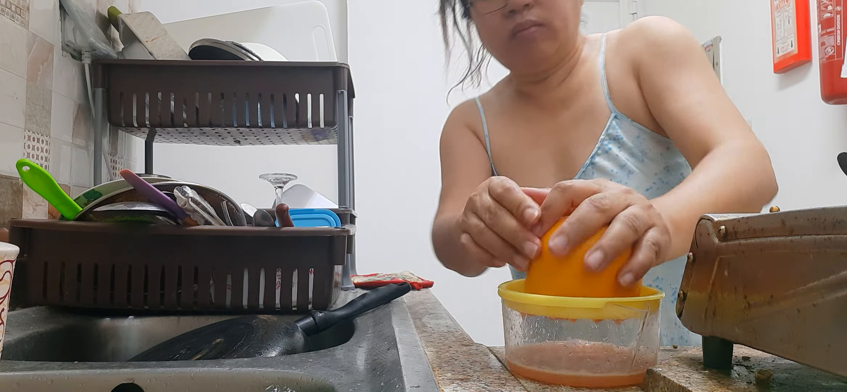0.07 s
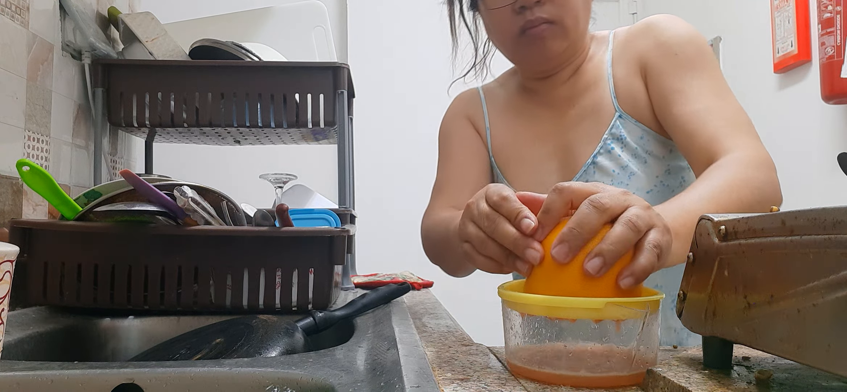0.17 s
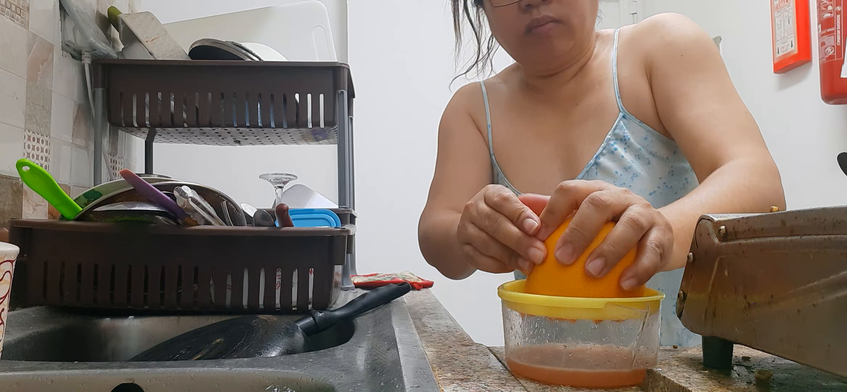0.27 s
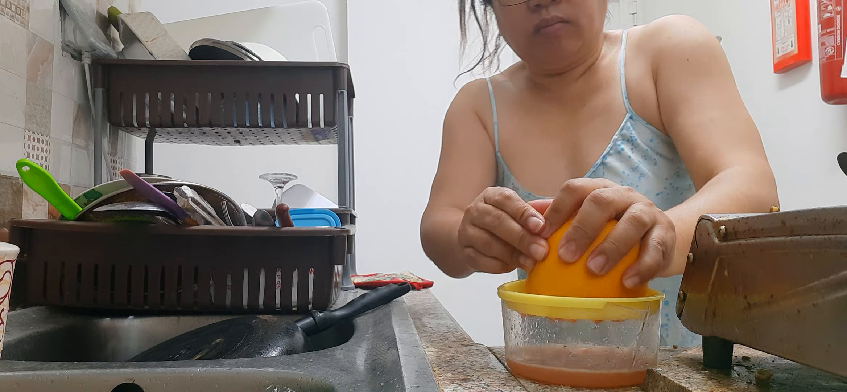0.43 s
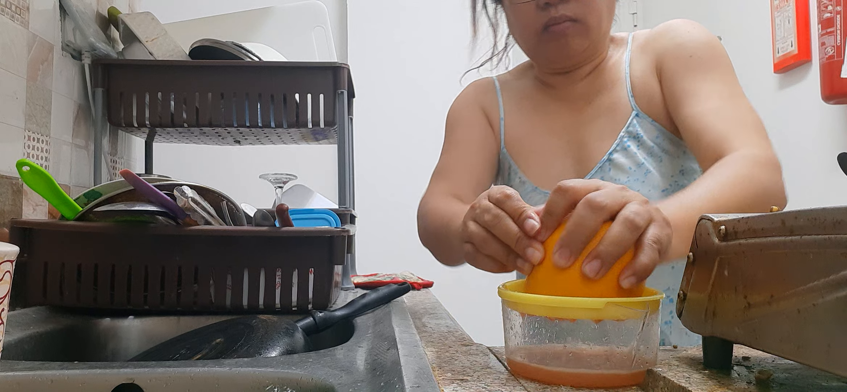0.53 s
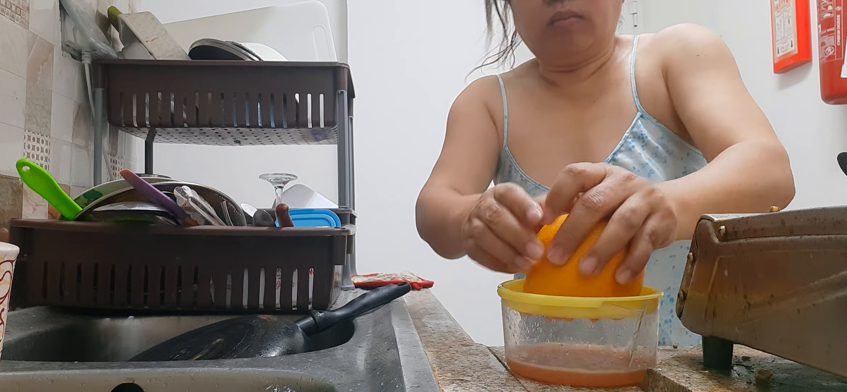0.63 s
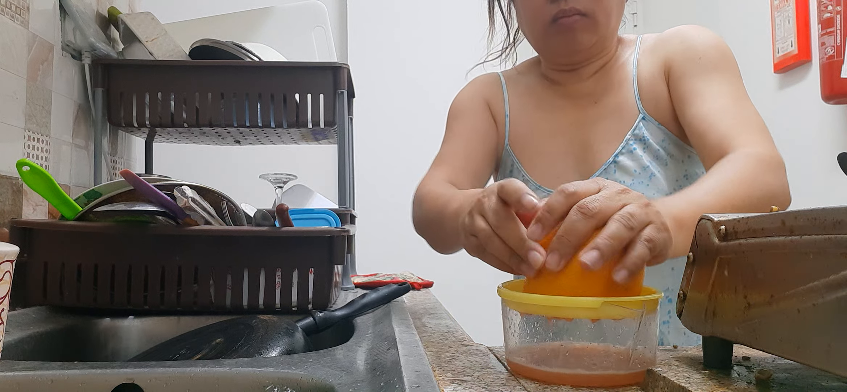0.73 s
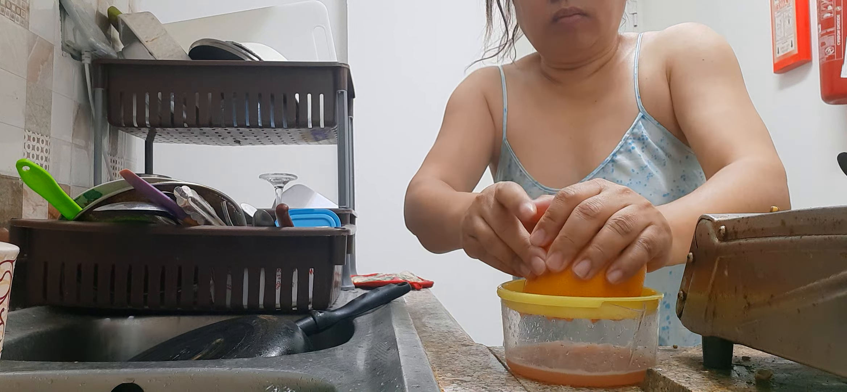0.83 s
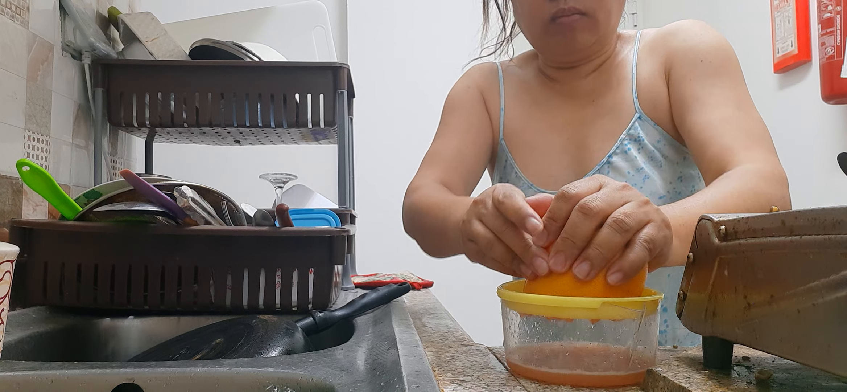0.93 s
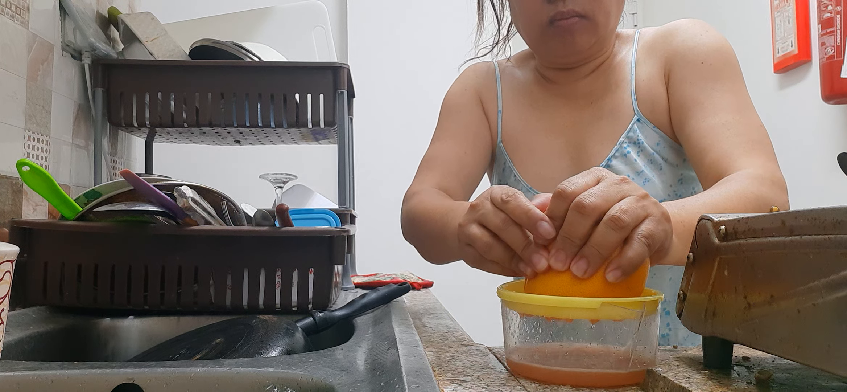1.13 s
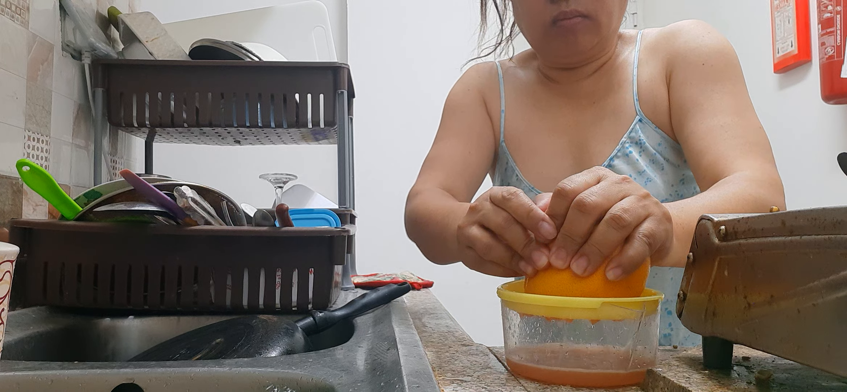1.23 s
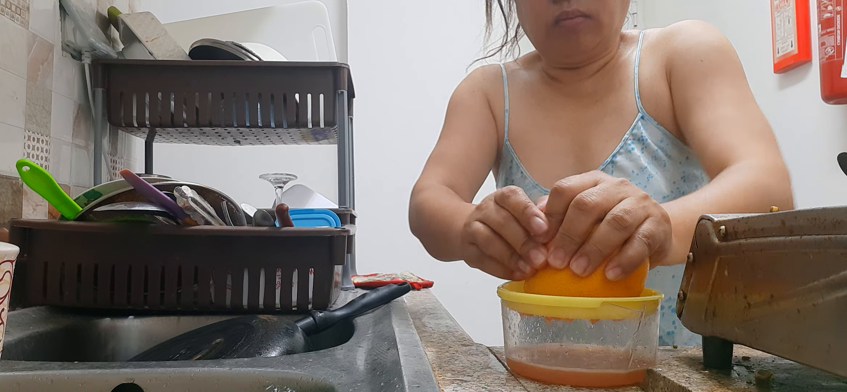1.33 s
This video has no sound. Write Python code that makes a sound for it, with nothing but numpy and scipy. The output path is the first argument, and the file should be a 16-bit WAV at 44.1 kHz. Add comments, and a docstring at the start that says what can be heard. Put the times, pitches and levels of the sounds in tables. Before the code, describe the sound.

A citrus half squishes on a plastic juicer, close by in a small, slightly echoing kitchen. Pulp crackles wetly from about 0.2 seconds, and the strainer knocks with a sharp pop near 0.45. Trapped air gurgles and glugs from 0.6 to 0.8. The rind squeaks briefly just before 1 second, then juice spurts with knocks and a squelch. Two lighter knocks follow around 1.2, over faint hum and hiss.

```python
"""A citrus half pressed and twisted on a plastic juicer, close to a microphone pair in a small hard kitchen.
Pulp bursts in dense wet crackles and the strainer knocks on its cup; both ring the plastic.
Wet pockets pop, the rind squeaks over the ribs, and juice spurts through the slots with a squelch.
Trapped air glugs and gurgles, heard in the centre and echoing off the counter and walls.
Underneath are dull thuds of the counter and the room tone: faint rumble, hiss and mains hum."""
import sys
import numpy as np
from scipy import signal
from scipy.fft import rfft, irfft, next_fast_len
from scipy.io import wavfile
from scipy.ndimage import uniform_filter1d

SR = 44100
rng = np.random.default_rng(int(sys.argv[2]) if len(sys.argv) > 2 else 0)


def log_audio(samples):
    """Write samples as a 16-bit WAV file to the path given in sys.argv[1]."""
    # one column per channel
    frames = np.atleast_2d(samples).T
    # limit to full scale, then quantise
    limited = np.clip(frames, -1, 1)
    pcm = np.round(limited * 32767).astype(np.int16)
    wavfile.write(sys.argv[1], SR, pcm)


N = 61739

# room tone spectrum: f/Hz, relative level/dB
AIR_SPECTRUM = [(25, -28.5), (40, -16), (52, -3.5), (130, -6), (200, -6.5), (370, -0.5), (510, -1),
                (680, -17.5), (1400, -22.5), (2300, -18.5), (2950, -15), (3600, -28), (4600, -10),
                (5300, -23), (6000, -26), (7200, -29.5), (9000, -38), (15500, -37.5)]
# room tone swell: t/s, level/dB
AIR_LEVEL = [(0, -61), (.2, -56), (.85, -61), (1.2, -61.5), (1.38, -64.5)]
# room tone width: f/Hz, side against mid/dB
AIR_WIDTH = [(100, -4), (400, -10.5), (1200, 1.5), (5000, 0)]
# mains hum: t/s, level/dB
HUM_LEVEL = [(0, -67.5), (.09, -60), (.21, -64), (.26, -77.5), (.8, -69), (1.3, -70), (1.39, -82)]
# centres of the six bands of knocks and squeezes: f/Hz
BAND_CENTRES = [400, 1000, 2100, 3700, 7200, 12500]
# knocks of strainer and ribs: t/s, rattle decay/s, six band levels/dB
STRAINER_KNOCKS = [(.096, 0.0025, -52, -57.5, -64, -62.5, -77, -94),
                   (0.4193, 0.0037, -54, -56, -48.5, -53.5, -54.5, -65),
                   (.4415, 0.0074, -47, -46.5, -49.5, -59, -62, -90),
                   (0.4592, 0.003, -53, -61, -52, -59, -77, -90),
                   (0.4626, 0.0038, -48, -39.5, -39.5, -43.5, -47, -56.5),
                   (1.007, 0.008, -57.5, -39.5, -39, -65, -32.5, -61.5),
                   (1.025, 0.0043, -47, -56, -37.5, -36, -36.5, -61),
                   (1.164, 0.011, -64, -57, -56, -47, -54, -74),
                   (1.239, 0.0095, -66.5, -50.5, -53.5, -45.5, -59, -70)]
# modes of strainer and cup: f/Hz, t60/s, lift/dB
JUICER_MODES = [(242, 0.17, 13), (340.7, 0.11, 7), (373, 0.35, 11), (489, 0.093, 0), (847, 0.11, -0.5),
                (1033, 0.028, 1.5), (2886, 0.063, 3), (3050, 0.15, -3)]
# broad tone colour shared by knocks and crackles, with microphone-like dips: f/Hz, relative level/dB
CONTACT_EQ = [(100, -24.5), (255, -15.5), (345, -4.5), (520, -2), (690, -4), (830, -1), (1250, -5.5),
              (2000, -2.5), (3200, -1), (4200, 1.5), (5200, 2), (5850, -2.5), (6800, 0), (8200, 0),
              (9500, -14.5), (11000, 1.5), (16000, -9)]
# counter under the pressing hands: t/s, half-width/s, level/dB
COUNTER_THUDS = [(.13, 0.05, -72), (0.747, 0.059, -61.5), (1.01, 0.033, -70.5)]
# glugs of trapped air: t/s, f/Hz, rise/s, level/dB
AIR_GLUGS = [(.194, 410.5, 0.01, -49.5), (0.59, 622, 0.01, -52.5), (0.758, 364, 0.0082, -50),
             (0.778, 350, 0.0039, -44.5), (0.789, 371, 0.0036, -42), (0.856, 349, 0.016, -55)]
# squeezes of the pulp: peak t/s, rise/s, fall/s, six band levels/dB
PULP_SQUEEZES = [(0.209, 0.0083, 0.048, -53.5, -51, -58, -63, -62.5, -103),
                 (0.289, 0.051, 0.04, -53.5, -50, -54.5, -54, -59, -74),
                 (.505, 0.025, 0.018, -61.5, -86, -82, -54.5, -66, -63.5),
                 (0.664, 0.017, 0.053, -56, -66.5, -61, -65.5, -62.5, -67.5),
                 (0.76, 0.0085, 0.0094, -60, -42, -47, -59.5, -110, -113),
                 (0.914, 0.0062, 0.011, -63, -56, -52.5, -54, -55.5, -61),
                 (0.938, 0.0046, 0.028, -55, -53, -40.5, -49.5, -51, -60),
                 (.976, .012, 0.012, -60.5, -52, -50, -57, -68, -70),
                 (1.031, 0.037, 0.051, -54.5, -47.5, -45, -53.5, -46.5, -79),
                 (1.069, 0.015, 0.0087, -53, -48.5, -47.5, -63, -50, -70)]
# wet pops and snaps: t/s, f/Hz, decay/s, level/dB
WET_POPS = [(0.4197, 4900, 0.0042, -36), (.4624, 920, 0.0023, -23), (.936, 840, 0.0087, -39),
            (1.0062, 874, 0.0049, -27), (1.022, 920, 0.0069, -34.5), (1.0228, 3310, 0.0026, -30)]
# course of the hollow gurgle: t/s, f/Hz, level/dB
GURGLE_CURVE = [(.563, 540, -56), (.576, 455, -47), (.585, 380, -47), (.594, 368, -45), (.607, 380, -54),
                (.615, 372, -49), (.625, 365, -55), (.636, 360, -48), (.648, 345, -57), (.67, 330, -60)]
# course of the rind's squeak: t/s, f/Hz, level/dB
SQUEAK_CURVE = [(.932, 2400, -59), (0.942, 2412, -46.5), (0.956, 2227, -52.5), (.964, 2866, -52),
                (0.977, 2999, -45), (0.987, 2840, -47.5), (0.996, 2616, -45), (1.004, 2530, -51)]
# ring of the strainer slots: f/Hz, t60/s, level/dB
SLOT_MODES = [(2992, 0.13, -41.5), (3270, 0.34, -44), (3530, 0.14, -46.5), (3915, 0.28, -45)]
# course of the pulp's squelch: t/s, f/Hz, level/dB
SQUELCH_CURVE = [(1.03, 900, -60), (1.05, 998.3, -49.5), (1.073, 1050, -46), (1.082, 1030, -58)]

HUM_HZ, HUM_WAVER_DB = 99.6, 5.5
KNOCK_S, RATTLE = .005, 1.67  # a knock has the energy of KNOCK_S at its level; rattle against tick
ROOM_T60_S, TREBLE_T60_S, TAIL_DB, EARLY_DECAY_S = .49, .34, -2.5, .0069
BASS_WET_DB, POP_WET_DB, GLUG_WET_DB = -11.5, -5.5, 2
THUD_HZ, THUD_WAVER_HZ = 53.4, 4.1
GLUG_SAG_PER_S, GLUG_ROUGH, GLUG_JITTER = 1, .15, .055
GRAINS_PER_S, GRAIN_SPREAD_DB = 1700, 3
SPURT_AT_S, SPURT_RISE_S = 1.023, .0021
LEFT_LEAD_DB, LEFT_LAG_S, TOP_HZ = 2, .00005, 15850


def undb(db):
    """Decibels to gain."""
    return 10 ** (np.asarray(db) / 20)


def unit(x):
    """Scale to rms 1."""
    return x / np.sqrt(np.mean(x ** 2) + 1e-20)


def colour(x, points):
    """Minimum-phase filter through points of f/Hz, level/dB."""
    hz, db = np.array(points, float).T
    size = 4096
    f = np.maximum(np.fft.rfftfreq(size, 1 / SR), 1)
    cepstrum = irfft(np.log(undb(np.interp(np.log(f), np.log(hz), db))))
    cepstrum[1:size // 2] *= 2
    cepstrum[size // 2 + 1:] = 0
    impulse = irfft(np.exp(rfft(cepstrum)))
    length = next_fast_len(N + size)
    return irfft(rfft(x, length) * rfft(impulse, length), length)[..., :N]


def banded(x, band_db):
    """Give a white sound a level in each band, about an octave wide."""
    hz = np.array(BAND_CENTRES)
    return colour(x, np.c_[hz, np.array(band_db) + 10 * np.log10(SR / hz)])


def walk(rate):
    """Smooth random drift of rms 1, with rate new values a second."""
    hold = int(SR / rate)
    steps = np.repeat(rng.standard_normal(N // hold + 1), hold)[:N]
    return unit(uniform_filter1d(uniform_filter1d(steps, hold), hold))


def tone(hz, jitter, flutter_db, rate):
    """A wet, unsteady oscillation: pitch and strength waver about rate times a second."""
    phase = 2 * np.pi * np.cumsum(hz * np.exp(jitter * walk(rate))) / SR
    return np.sin(phase) * undb(flutter_db * walk(rate))


def glide(t, curve, jitter, flutter_db, rate):
    """An unsteady tone that follows points of t/s, f/Hz, level/dB."""
    at, hz, db = np.array(curve).T
    gate = np.clip(np.minimum(t - at[0], at[-1] - t) / .003, 0, 1)
    return tone(np.interp(t, at, hz), jitter, flutter_db, rate) * undb(np.interp(t, at, db)) * gate


def room_tone(t):
    """Low rumble and thin hiss spread across the pair, with a wavering mains hum in the centre."""
    mid, side = colour(rng.standard_normal((2, N)), AIR_SPECTRUM)
    air = unit(mid + colour(side, AIR_WIDTH) * np.array([[1], [-1]]))
    hum_db = np.interp(t, *np.array(HUM_LEVEL).T) + HUM_WAVER_DB * walk(7.7)
    hum = np.sqrt(2) * np.sin(2 * np.pi * HUM_HZ * t) * undb(hum_db)
    return air * undb(np.interp(t, *np.array(AIR_LEVEL).T)) + hum


def clatter(decay):
    """A sharp tick and a short decaying rattle, with an even spectrum and energy 1."""
    size = 2048
    fade = np.exp(-np.arange(size) / (SR * decay))
    hit = RATTLE * unit(rng.standard_normal(size) * fade)
    hit[0] -= np.sqrt(size)  # the tick
    phase = np.angle(rfft(hit, 2 * size))
    even = irfft(np.exp(1j * phase))[:size]
    return np.pad(unit(even) / np.sqrt(size), (0, N - size))


def knocks():
    """The strainer jolts against its cup."""
    hits = sum(banded(np.roll(clatter(decay), int(at * SR)), band_db)
               for at, decay, *band_db in STRAINER_KNOCKS)
    return hits * np.sqrt(KNOCK_S * SR)


def juicer(x, t):
    """The plastic rings on at its modes; strike and ring then share one broad tone colour."""
    ring = 0
    for hz, t60, db in JUICER_MODES:
        damping = np.log(1000) / t60
        ring += undb(db) * 2 * damping / SR * np.exp(-damping * t) * np.cos(2 * np.pi * hz * t)
    return colour(x + signal.fftconvolve(x, ring)[:N], CONTACT_EQ) * undb(-4)


def kitchen(x, t):
    """Quick reflections off the counter, then the tail of the walls, different at each microphone."""
    noise = rng.standard_normal((2, N))
    low = signal.sosfilt(signal.butter(1, 4000, fs=SR, output="sos"), noise)
    tail = low * undb(-60 * t / ROOM_T60_S) + (noise - low) * undb(-60 * t / TREBLE_T60_S)
    early = rng.standard_normal((2, N)) * np.exp(-t / EARLY_DECAY_S) * (t > .001)
    response = (undb(TAIL_DB) * unit(tail * (t > .006)) + unit(early)) / np.sqrt(N)
    reflected = signal.fftconvolve(x[None], response, axes=1)[:, :N]
    return colour(reflected, [(350, BASS_WET_DB), (1500, 0)])


def thuds(t):
    """The counter booms faintly as weight shifts onto it."""
    hz = THUD_HZ + THUD_WAVER_HZ * walk(31.1)
    boom = np.sqrt(2) * np.sin(2 * np.pi * np.cumsum(hz) / SR)
    return boom * sum(undb(db) * np.exp(-.5 * ((t - at) / width) ** 2) for at, width, db in COUNTER_THUDS)


def glugs(t):
    """Air pockets under the fruit ring briefly and sag in pitch."""
    out = 0
    for at, hz, rise, db in AIR_GLUGS:
        age = np.maximum(t - at, 0)
        pitch = hz * np.exp(GLUG_JITTER * walk(200) - GLUG_SAG_PER_S * age)
        phase = 2 * np.pi * np.cumsum((age > 0) * pitch) / SR
        swell = (age / rise) ** 2 * np.exp(1 - (age / rise) ** 2)
        rough_octave = GLUG_ROUGH * walk(hz / 5) * np.sin(2 * phase)
        out += undb(db) * swell * (np.sin(phase) + rough_octave)
    return out


def crackle():
    """Random clicks, mostly small and a few large; rms 1."""
    bursts = rng.random(N) < GRAINS_PER_S / SR
    size_db = GRAIN_SPREAD_DB * np.minimum(rng.exponential(size=N), 5)
    return unit(bursts * rng.choice([-1, 1], N) * undb(size_db))


def pulp(t):
    """Juice cells burst in a crackle that swells and dies with each squeeze."""
    out = 0
    for at, rise, fall, *band_db in PULP_SQUEEZES:
        push = np.exp(np.where(t < at, -.5 * ((t - at) / rise) ** 2, -(t - at) / fall))
        out += banded(crackle() * push, band_db)
    return out


def pops(t):
    """Small wet pockets snap open and ring for a few cycles."""
    out = 0
    for at, hz, decay, db in WET_POPS:
        age = np.maximum(t - at, 0)
        ring = tone(hz * (age > 0), jitter=.04, flutter_db=1, rate=600)
        attack = 1 - np.exp(-age / (.28 * decay))
        out += undb(db) * ring * attack * np.exp(-age / decay)
    return out


def gurgle(t):
    """Air drawn under the fruit gives a hollow, throbbing note that falls as the pocket opens."""
    note = glide(t, GURGLE_CURVE, jitter=.03, flutter_db=1.2, rate=250)
    overtones = sum(glide(t, np.array(GURGLE_CURVE) * [1, ratio, 1], jitter=.1, flutter_db=4, rate=400)
                    for ratio in (1.5, 2.5))
    return note + overtones * undb(-17)


def squeak(t):
    """The rind squeaks over the ribs, up and back down with the twist."""
    return glide(t, SQUEAK_CURVE, jitter=.08, flutter_db=5, rate=1800)


def spurt(t):
    """Juice shoots through the strainer, whose slots ring on brightly."""
    age = np.maximum(t - SPURT_AT_S, 0)
    ring = sum(tone(hz, jitter=.025, flutter_db=4, rate=800) * undb(db - 60 * age / t60)
               for hz, t60, db in SLOT_MODES)
    return ring * (1 - np.exp(-age / SPURT_RISE_S))


def squelch(t):
    """Wet pulp squelches after the spurt."""
    return glide(t, SQUELCH_CURVE, jitter=.16, flutter_db=4, rate=700)


def scene():
    """The juicer stands close to the pair, a little louder and a trace later in the left microphone."""
    t = np.arange(N) / SR
    contact = juicer(pulp(t) + knocks(), t) + squeak(t) + squelch(t) + spurt(t)
    trapped_air = glugs(t) + gurgle(t)
    snaps = pops(t)
    near = contact + snaps
    left = np.roll(near, round(LEFT_LAG_S * SR)) * (t > LEFT_LAG_S)
    direct = np.array([left, near])
    reflected = kitchen(contact + undb(POP_WET_DB) * snaps + undb(GLUG_WET_DB) * trapped_air, t)
    balance = undb(np.array([[LEFT_LEAD_DB], [-LEFT_LEAD_DB]]) / 2)
    return (direct + reflected) * balance + trapped_air + thuds(t) + room_tone(t)


def record(dry):
    """A steep low-pass cuts the top of both microphone channels."""
    return signal.sosfilt(signal.ellip(10, .2, 70, TOP_HZ, fs=SR, output="sos"), dry)


dry = scene()
out = record(dry)
log_audio(out)
```